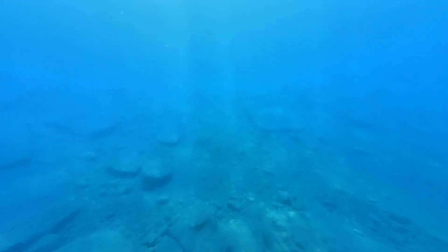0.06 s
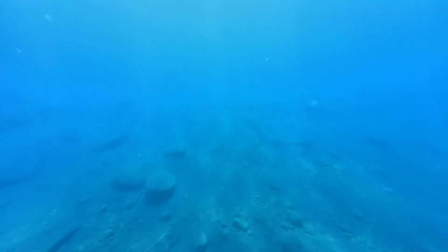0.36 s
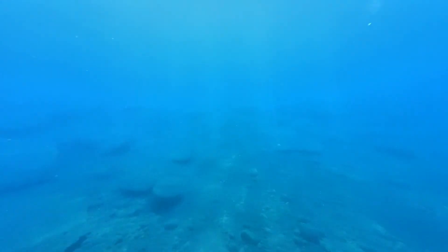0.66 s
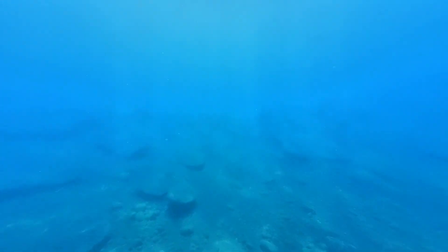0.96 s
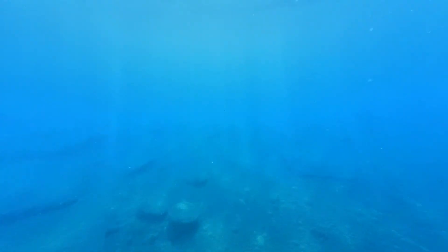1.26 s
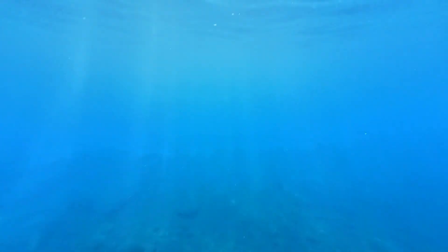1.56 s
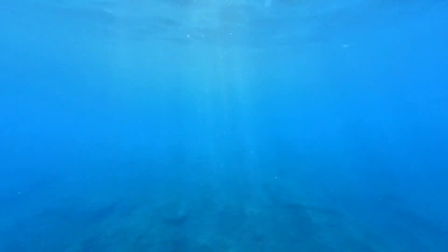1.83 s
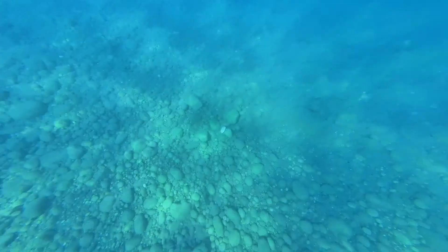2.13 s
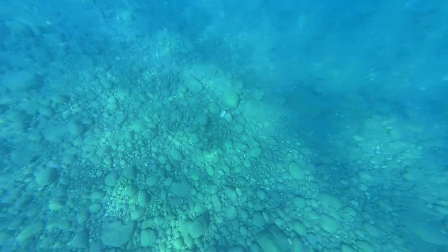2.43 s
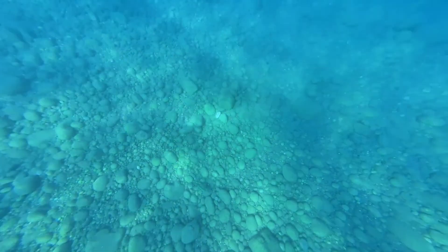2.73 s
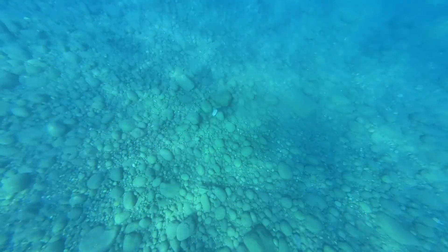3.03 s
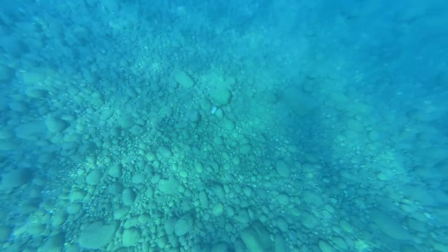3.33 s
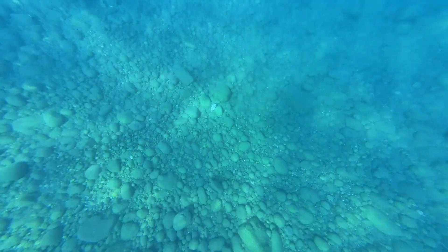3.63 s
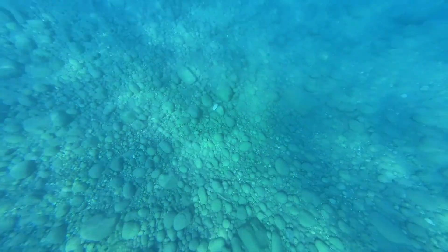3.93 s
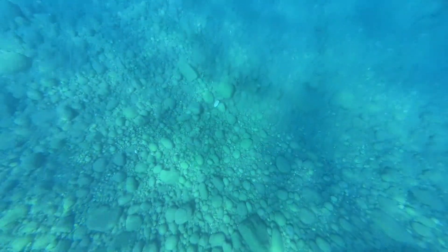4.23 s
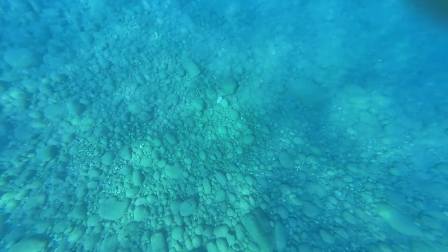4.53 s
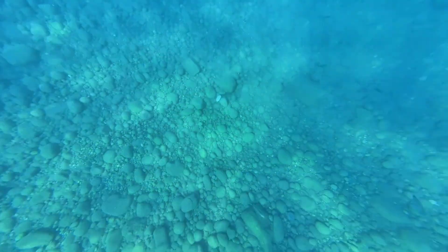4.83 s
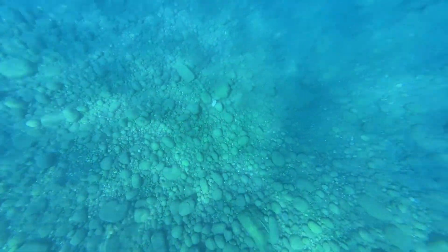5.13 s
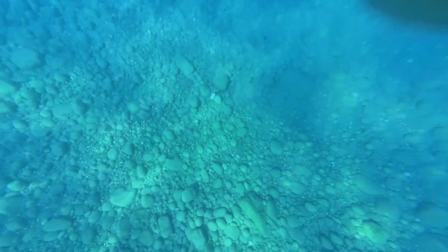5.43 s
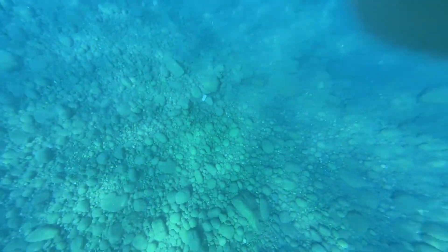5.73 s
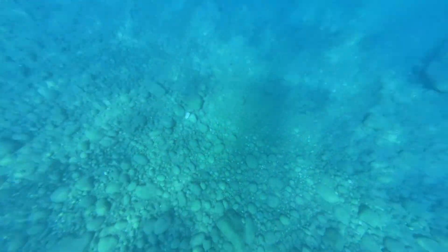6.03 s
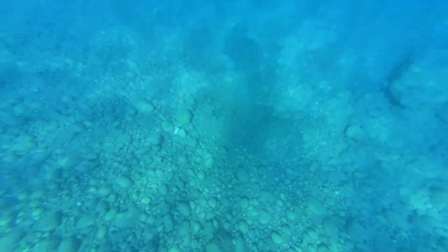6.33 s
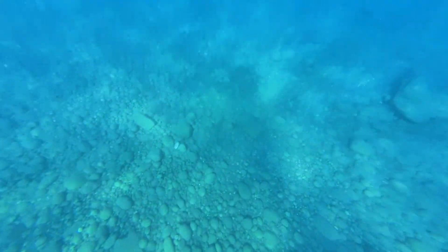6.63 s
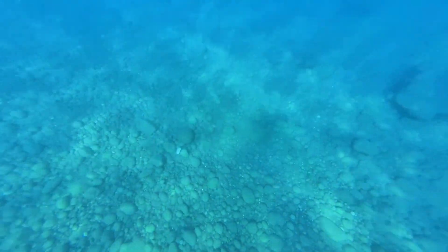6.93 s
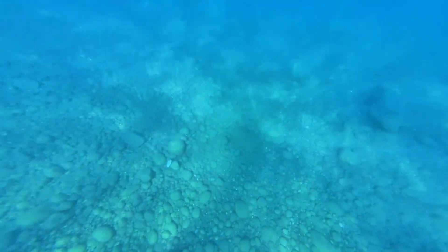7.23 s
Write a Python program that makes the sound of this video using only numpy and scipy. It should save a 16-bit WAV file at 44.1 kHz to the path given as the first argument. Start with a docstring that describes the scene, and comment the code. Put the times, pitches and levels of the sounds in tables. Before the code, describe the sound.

A submerged microphone picks up quiet open-water hiss and distant clicks, then soft lapping near the surface and several close knocks on its casing. Suddenly it is inside a loud cloud of bubbles from a dive, churning, glugging and popping. The low gurgle drops away as the large bubbles leave, and the sound grows thinner, higher and softer until only a light fizz with small pops remains.

```python
"""Under the sea, inside a dive's bubbles

A microphone in a camera housing hears far crackle and ticks in open water, then gulps, wavelets and
knocks as it nears the surface. After a brief silent cut it sits in a cloud of air dragged down by a dive.
Big bubbles rise away first, so the pitch climbs as the cloud fades from a gurgling rush to a fine fizz."""
import sys
import numpy as np
from scipy import signal
from scipy.fft import rfft, irfft, next_fast_len
from scipy.io import wavfile
from scipy.ndimage import uniform_filter1d

SR = 44100
rng = np.random.default_rng(int(sys.argv[2]) if len(sys.argv) > 2 else 0)


def pcm_store(signal):
    """Save signal as 16-bit PCM."""
    levels = np.round(np.clip(np.atleast_2d(signal), -1, 1) * 32767)
    wavfile.write(sys.argv[1], SR, levels.astype(np.int16).T)


N = 329868
FFT_SIZE = 2 * next_fast_len(N)
TIME, BINS_HZ = np.arange(N) / SR, np.fft.rfftfreq(FFT_SIZE, 1 / SR)
CUT_START_S, CUT_END_S = 2.155, 2.175

# open water, far off: freq_hz, gain_db
SEA_COLOUR = [(35, -35), (75, -3), (170, 0.5), (300, -5.5), (600, -11.5), (1500, -14.5), (3600, -15.5),
              (4500, -1), (5500, 2.5), (6500, -4.5), (7600, -20.5), (10000, -34), (12500, -43)]
# water moving round the housing: freq_hz, gain_db
RUMBLE_COLOUR = [(25, -25), (60, -4.5), (100, -2.5), (160, -8.5), (400, -30), (1500, -79)]
# surges against the housing: crest_s, level_db, half_length_s
SURGES = [(0.63, -66, 0.032), (1.584, -58, 0.078), (1.898, -46, 0.14), (2.335, -32.5, 0.052),
          (2.739, -37.5, 0.037), (3.214, -52, 0.066), (3.586, -47, 0.049), (5.394, -62, 0.11)]
# single bubbles near the microphone: start_s, level_db, pitch_hz, glide_ratio, t60_s, splash_share
NEAR_BUBBLES = [(.002, -53.5, 558, 0.015, 0.13, 0.36), (.002, -50, 1750, 0.044, 0.078, 0.2),
                (.043, -55, 2920, -.03, 0.041, 0.3), (.226, -54, 1875, -0.24, 0.045, 0.55),
                (.44, -52, 3950, -.1, 0.03, 0.9), (.458, -59, 3080, -.12, 0.063, 0.94),
                (.6, -50, 2500, -0.2, .05, 1), (.619, -47.5, 99.5, -0.4, 0.057, 0),
                (.624, -59, 1990, -.17, 0.044, .7), (1.203, -48.5, 1740, -0.15, .075, 0.1),
                (1.214, -41.5, 2890, -0.071, .035, 0.03), (1.224, -55, 2320, -.05, 0.04, 0),
                (1.424, -57, 2000, 0, 0.029, 0.5), (1.453, -31, 2610, -0.19, .023, 0.15),
                (1.57, -41.5, 86.7, 0.17, 0.074, 0.3), (1.702, -43.5, 3050, -0.16, 0.028, 0.2),
                (1.757, -53, 990, -0.11, .08, .4), (1.787, -40, 309, -0.52, .15, 0),
                (1.79, -59, 1630, 0.14, 0.11, 0.8), (1.832, -36, 122, 0.031, 0.1, 0.1),
                (1.85, -46.5, 724, 0.086, 0.055, .3), (1.893, -55, 1830, 0, .06, 0.5),
                (1.901, -33.5, 88, -0.15, 0.091, 0.14), (2.024, -48, 3200, -.05, 0.033, .3),
                (2.043, -51, 2550, -0.038, .035, .2), (2.044, -53, 1150, 0, 0.1, 0),
                (2.19, -19, 769, -0.18, 0.12, .25), (2.235, -28.5, 174.6, 0.24, 0.23, 0.17),
                (2.6, -18.5, 1047, -.094, 0.092, .5), (2.612, -16, 1246, 0.035, .07, 0.2),
                (2.648, -11, 505, -.14, .16, .03), (2.68, -16, 720, -0.035, 0.083, 0.1),
                (3.191, -31.5, 338, -0.16, 0.11, 0.2), (3.227, -31.5, 166, -0.079, .15, 0.05),
                (3.28, -28.5, 400, -0.0038, 0.11, .3), (3.519, -23, 1364, -0.063, .075, .3),
                (3.558, -22, 1405, 0.0069, 0.077, .3), (3.614, -41, 152, 0.084, .18, .1),
                (3.696, -28, 749, -0.043, 0.1, 0), (3.701, -24, 1100, 0.13, 0.078, .4),
                (4.156, -29.5, 1500, 0, 0.047, 0.2), (4.279, -32.5, 167, -0.2, 0.17, 0.01),
                (4.597, -50, 171, -.083, 0.14, 0), (4.868, -42.5, 158, -0.12, 0.14, .3),
                (4.999, -49, 118, -.45, 0.069, 0.05), (5.139, -52, 120, -0.41, .11, 0),
                (5.455, -48, 744, 0.027, .12, 0.8), (5.585, -42, 1484, -0.052, 0.054, 0.33),
                (5.762, -41.5, 764, 0.27, .06, .6), (5.776, -45, 1023, 0.41, 0.085, 0.8),
                (5.792, -41, 840, .02, 0.075, 0.2), (5.943, -48, 595, 0.028, .11, 0),
                (5.948, -53, 755, 0.077, .14, 0.7), (6.014, -44.5, 104, -0.23, 0.064, 0.2),
                (6.083, -46, 875, -.03, .06, .4), (6.099, -53.5, 450, 0.02, 0.12, 0.95),
                (6.146, -34.5, 1207, 0.11, 0.08, .2), (6.19, -42, 1250, 0.028, 0.065, 0.85),
                (6.355, -52, 724, -0.11, 0.064, 1), (6.554, -57, 85, -0.043, 0.071, 0.2),
                (6.681, -62, 109.6, 0, 0.11, 0.06), (7.09, -52, 860, -0.092, 0.075, .2),
                (7.292, -40.5, 2390, -0.024, 0.035, .7), (7.307, -43, 1800, -.06, 0.047, 0.36),
                (7.352, -42.5, 1634, -0.012, 0.069, .3), (7.357, -50, 1300, -0.073, .05, .6),
                (7.36, -58, 660, -0.32, .1, .7)]
# ticks out in open water: start_s, level_db, pitch_hz, scatter_db, sharpness_q
TICKS = [(0.236, -50, 6400, -52.5, 4.2), (0.377, -59, 5830, -54, 6), (.545, -33.5, 5160, -49.5, 2.9),
         (.6, -56, 2400, -55, 1.5), (.650, -58, 3560, -48, 1.1), (0.689, -28.5, 5850, -52, 8),
         (0.778, -34.5, 4960, -54, 3.3), (0.781, -43, 3520, -53, 3), (1.047, -29.5, 5350, -48, 7),
         (1.184, -32, 5600, -50, 5.6), (1.304, -49, 5400, -52.5, 4.4), (1.374, -39, 5140, -53, 3),
         (1.454, -36.5, 4800, -49, 3), (1.789, -39, 6030, -49, 2.8), (2.0606, -33, 4570, -44, 3.5)]
# what the housing leaves of a snap's treble: freq_hz, gain_db
SNAP_ROLLOFF = [(6300, 0), (7500, -11), (10000, -13), (12000, -24)]
# wavelets overhead: freq_hz, gain_db
LAP_COLOUR = [(200, -22), (500, -3), (800, -20), (1300, -21), (1850, -10.5), (2400, -23), (3300, -15.5),
              (5000, -11.5), (9000, -38), (13000, -70)]
# air trapped by a folding wavelet: freq_hz, gain_db
SLOSH_COLOUR = [(100, 4.5), (280, 7.5), (450, -6), (750, -9), (1100, -19), (2000, -30), (4000, -60)]
# bumps on the housing: start_s, click_db, click_hz, thump_db, thump_hz, thump_t60_s
KNOCKS = [(1.950, -14, 2970, -26, 193, 0.029), (1.9994, -35.5, 790, -33, 149, .045),
          (2.1058, -13.5, 2700, -24, 153, 0.046), (2.336, -12, 252, -10, 154, 0.039),
          (6.361, -48.5, 497, -60, 167, 0.044)]
# the cloud as each bubble size rises away: time_s, commonest_pitch_hz, level_db
CLOUD_COURSE = [(2.18, 1030, -8), (2.3, 1140, -10.5), (2.64, 1100, -8.3), (2.8, 1125, -10),
                (2.95, 1096, -10.5), (3.3, 1150, -11.5), (3.44, 1290, -14.5), (3.56, 1540, -18),
                (3.61, 2010, -22), (3.68, 2500, -23.5), (3.95, 2740, -24.5), (4.85, 2830, -25),
                (5.08, 3100, -26), (5.22, 3800, -29), (5.55, 4200, -30.5), (5.72, 4640, -30.5),
                (6.12, 4790, -33), (6.28, 5180, -35.5), (7.48, 5340, -36.5)]
# spread of bubble sizes about the commonest: pitch_ratio, gain_db
BUBBLE_SIZES = [(0.1, -27), (0.25, -11), (0.5, -7.5), (0.75, -3.5), (1.0, 0.92), (1.25, -7), (1.6, -12),
                (2.5, -23), (4.0, -30.5), (8.0, -48.5), (11, -68.5)]
# what the housing lets through to the microphone: freq_hz, gain_db
HOUSING_COLOUR = [(150.0, -0.5), (350.0, -9.5), (600.0, -1), (1000.0, -4.5), (1500.0, -5), (2000.0, -3),
                  (3000.0, -3), (4500.0, -5.5), (5600.0, -5), (6500.0, -22.5), (7500.0, -23), (10000, -24),
                  (12000.0, -44)]
# resonances of the housing: freq_hz, half_width_hz, gain_db
HOUSING_MODES = [(732, 36, 5), (875, 60, 3), (985, 50, 4), (1095, 48, 6.5), (1222, 48, 6.5), (1355, 58, 9),
                 (1495, 75, 11.5), (1675, 75, 7.5), (1845, 40, 3), (2050, 55, 4), (2150, 60, 5),
                 (2365, 85, 7.5), (2590, 75, 4.5), (2770, 100, 5), (2920, 80, 3), (3340, 110, 2.5),
                 (3640, 90, 1)]
# large bubbles tearing loose: freq_hz, gain_db
GURGLE_COLOUR = [(70, -31), (130, -14), (220, -3), (350, -7), (500, -1.5), (800, -23), (1000, -38)]
# the finest bubbles: freq_hz, gain_db
FIZZ_COLOUR = [(780, -77), (1050, -44), (1500, -52.5), (2200, -82), (3500.0, -92.5), (5600.0, -48.5),
               (6800.0, -54), (7700.0, -67.5), (9700.0, -77), (11200.0, -93), (13000.0, -102)]
# narrow housing resonances that the fizz excites: freq_hz, width_hz, gain_db
FIZZ_RINGS = [(3060, 80, -34.5), (3620, 110, -45), (3990, 150, -38), (4830, 280, -44), (5260, 180, -39.5),
              (5710, 120, -47), (6370, 110, -48)]
# pricks right at the housing: freq_hz, gain_db
CRACKLE_COLOUR = [(2000, -18), (4000, -6), (6200, 5.5), (7500, -5.5), (10000, -14), (12000, -32.5)]
# the sizzle's comings and goings: time_s, level_db
SIZZLE_LEVEL = [(2.25, -93), (2.38, -93), (3.99, -81.5), (4.33, -88), (4.77, -79), (5.7, -84.5),
                (6.33, -80.5), (6.43, -96), (6.61, -79.5), (7.41, -83), (7.45, -75.5)]
# specks of air, at the top of the band: freq_hz, gain_db
SIZZLE_COLOUR = [(7500, -31), (8800, -9), (9600, 4), (10200, -2.5), (10800, -12), (11600, -28)]
# bubbles bursting against the housing: start_s, level_db, pitch_hz, scatter_db
BURSTS = [(2.177, -17, 1100, -27), (2.614, -17, 1930, -34), (2.936, -22, 2400, -39),
          (3.084, -19, 1300, -40), (3.2012, -17, 1200, -40), (3.248, -12.5, 1200, -37),
          (3.3537, -10.5, 1210, -37), (3.649, -18.5, 2440, -35), (3.651, -30, 4000, -43),
          (3.697, -21, 1500, -35), (3.712, -24, 1770, -35), (3.779, -16, 2410, -32),
          (3.7795, -26, 1400, -36), (4.2987, -23, 2600, -43), (4.383, -21, 2730, -41),
          (4.7086, -22, 2740, -40), (4.834, -21, 2890, -38), (5.1229, -27, 3200, -46),
          (5.332, -22, 3980, -39), (5.391, -27, 4020, -43), (5.5615, -21.5, 3940, -38),
          (6.089, -31, 5450, -48), (6.25, -30, 5000, -48), (6.547, -28.5, 4800, -52),
          (6.614, -36, 4200, -44), (6.7275, -28, 4700, -42), (6.828, -38, 2000, -54),
          (6.938, -26.5, 5200, -43), (6.963, -34, 4600, -46), (7.3523, -32, 5200, -49)]


def amp(db):
    """Decibels to gain."""
    return 10 ** (np.asarray(db) / 20)


def unit_rms(x):
    """Scales to rms 1."""
    return x / np.sqrt(np.mean(x ** 2) + 1e-20)


def colour_db(points, hz=BINS_HZ):
    """Reads a spectrum along a log-frequency axis."""
    freqs, gains_db = np.transpose(points)
    return np.interp(np.log(hz + 1e-6), np.log(freqs), gains_db)


def follow(rows, t):
    """All columns of a curve at the times t."""
    times, *columns = np.transpose(rows)
    return [np.interp(t, times, column) for column in columns]


def add(mix, start_s, sound):
    """Mixes a sound in at start_s."""
    part = mix[max(round(start_s * SR), 0):][:len(sound)]
    part += sound[:len(part)]


def coloured(x, gain_db):
    """Filters a whole track by a gain for every bin."""
    return irfft(rfft(x, FFT_SIZE) * amp(gain_db))[:N]


def to_spectra(x, frame=1024):
    """Frequencies, times and short-time spectra of a track."""
    return signal.stft(x, SR, nperseg=frame, noverlap=frame * 3 // 4)


def to_track(spectra, frame=1024):
    """Joins short-time spectra into a track."""
    return signal.istft(spectra, SR, nperseg=frame, noverlap=frame * 3 // 4)[1][:N]


def ripple(shape, bins, frames):
    """A random field of rms 1, smoothed over frequency bins and time frames."""
    field = uniform_filter1d(rng.standard_normal(shape), bins, axis=0)
    return unit_rms(uniform_filter1d(field, frames, axis=1))


def patchy(x, depth_db, bins, frames, frame=512):
    """Makes a track swell and dip in random patches of frequency and time."""
    spectra = to_spectra(x, frame)[2]
    return to_track(spectra * amp(depth_db * ripple(spectra.shape, bins, frames)), frame)


def pops(per_s, spread_db):
    """A white crackle of rms 1: random impulses, most small, a few large."""
    size = amp(spread_db * np.minimum(rng.exponential(1, N), 5))
    return unit_rms(size * rng.choice([-1, 1], N) * (rng.random(N) < per_s / SR))


def climb_octaves(t, fresh_hz=1080):
    """How far the cloud's pitch stands above that of the fresh cloud."""
    return np.log2(follow(CLOUD_COURSE, t)[0] / fresh_hz)


def sea(level_db=-61.5, hiss_share=0.56):
    """Countless far clicks merge into a gently wavering hiss; nearer ones stand out of it."""
    far = np.sqrt(hiss_share) * rng.standard_normal(N)
    nearer = np.sqrt(1 - hiss_share) * pops(per_s=900, spread_db=3.4)
    clicks = patchy(far + nearer, depth_db=-0.3, bins=8, frames=10)
    swell_db = 1.3 * unit_rms(np.interp(TIME, np.linspace(0, N / SR, 150), rng.standard_normal(150)))
    return amp(level_db + swell_db) * unit_rms(coloured(clicks, colour_db(SEA_COLOUR)))


def surge(crest_s, level_db, half_length_s):
    """A bell-shaped swell of gain."""
    return amp(level_db) * np.exp(-((TIME - crest_s) / half_length_s) ** 2)


def flow(calm_db=-89, stirred_db=-53, fall_db_per_octave=30.5):
    """Water rumbles round the housing: faint when calm, stirred by the cloud, swelling in surges."""
    rumble = unit_rms(coloured(rng.standard_normal(N), colour_db(RUMBLE_COLOUR)))
    stirred = (TIME >= CUT_END_S) * amp(stirred_db - fall_db_per_octave * climb_octaves(TIME))
    return (amp(calm_db) + stirred + sum(surge(*row) for row in SURGES)) * rumble


def ring(hz, t60_s, glide, rise_cycles=0.095):
    """A sine of peak 1 whose pitch slides as it dies away, like a pulsing pocket of air."""
    t = np.arange(int(t60_s * SR) + 2) / SR
    pitch_hz = hz * (1 + glide * (1 - np.exp(-4 * t / t60_s)))
    envelope = amp(-60 * t / t60_s) * (1 - np.exp(-t * hz / rise_cycles))
    wave = envelope * np.sin(2 * np.pi * np.cumsum(pitch_hz) / SR)
    return wave / abs(wave).max()


def near_bubbles(gain_db=-1, echo_t60_s=0.03, wobble_ratio=0.094):
    """Close bubbles gulp and chirp; splashy ones wobble in shape and scatter, blurring their note."""
    out, t = np.zeros(N), np.arange(4096) / SR
    for start_s, level_db, hz, glide, t60_s, splash in NEAR_BUBBLES:
        clean = ring(hz, t60_s, glide, rise_cycles=0.5)
        lowpass = signal.butter(2, wobble_ratio * hz, fs=SR)
        wobble = signal.lfilter(*lowpass, rng.standard_normal(SR))[-len(clean):]
        echoes = rng.standard_normal(len(t)) * amp(-60 * t / echo_t60_s)
        blurred = signal.fftconvolve(clean * wobble, echoes)
        blurred *= np.linalg.norm(clean) / np.linalg.norm(blurred)
        add(out, start_s, amp(gain_db + level_db) * np.sqrt(1 - splash) * clean)
        add(out, start_s, amp(gain_db + level_db) * np.sqrt(splash) * blurred)
    return out


def snap(hz, level_db, scatter_db, cycles, scatter_t60_s, q):
    """A pulse that crests after the given cycles, then its scatter off the surface and the stones."""
    t = np.arange(4096) / SR
    age = t * hz / cycles
    pulse = age * np.exp(1 - age) * np.sin(2 * np.pi * hz * t)
    scatter = unit_rms(signal.lfilter(*signal.iirpeak(hz, q, fs=SR), rng.standard_normal(len(t))))
    return amp(level_db) * pulse + amp(scatter_db - 60 * t / scatter_t60_s) * scatter


def ticks():
    """Sharp snaps carry in from open water, each trailing its scatter."""
    out = np.zeros(N)
    for start_s, level_db, hz, scatter_db, q in TICKS:
        add(out, start_s, snap(hz, level_db, scatter_db, cycles=1.03, scatter_t60_s=0.065, q=q))
    return coloured(out, colour_db(SNAP_ROLLOFF))


def lapping(near_s=1.86, near_db=-57, rise_db_per_s=36, late_rise_db_per_s=2):
    """Wavelets lap overhead, swelling quickly as the microphone comes up, then only creeping louder."""
    wavelets = patchy(pops(per_s=3000, spread_db=2.5), depth_db=5, bins=4, frames=8)
    since_s = TIME - near_s
    level_db = near_db + np.minimum(rise_db_per_s * since_s, late_rise_db_per_s * since_s)
    return amp(level_db) * unit_rms(coloured(wavelets, colour_db(LAP_COLOUR)))


def swarm(low_hz, high_hz, t60_cycles, glide_spread, count):
    """Bubbles of random size and moment ring across a range of pitch, at rms 1 together."""
    out = np.zeros(N)
    for when, height, slide, force in rng.random((count, 4)):
        hz = low_hz * (high_hz / low_hz) ** height
        bubble = ring(hz, t60_cycles / hz, glide_spread * (2 * slide - 1))
        add(out, when * N / SR, amp(10 * force) * hz * bubble)
    return unit_rms(out)


def slosh():
    """One wavelet folds over and traps a short flurry of bubbles."""
    flurry = swarm(low_hz=108, high_hz=2300, t60_cycles=12, glide_spread=0.36, count=1700)
    fold = surge(crest_s=1.815, level_db=-46.5, half_length_s=0.04)
    return fold * unit_rms(coloured(flurry, colour_db(SLOSH_COLOUR)))


def knocks():
    """Something bumps the housing: a dry click and a low thump that sinks in pitch."""
    out = np.zeros(N)
    for start_s, click_db, click_hz, thump_db, thump_hz, thump_t60_s in KNOCKS:
        click = snap(click_hz, click_db, click_db - 28, cycles=0.27, scatter_t60_s=0.0196, q=2.5)
        add(out, start_s, click)
        add(out, start_s, amp(thump_db) * ring(thump_hz, thump_t60_s, glide=-0.5, rise_cycles=0.52))
    return coloured(out, colour_db(SNAP_ROLLOFF))


def housing_modes_db():
    """What the housing's resonances add at each frequency."""
    return sum(db * np.exp(-((BINS_HZ - hz) / width) ** 2) for hz, width, db in HOUSING_MODES)


def cloud(gain_db=-0.5, churn_octaves=0.05, top_mode_db=8, top_mode_half_width_hz=160):
    """Thousands of bubbles a second pulse all round the microphone, higher as the big ones leave."""
    hz, t, spectra = to_spectra(pops(per_s=9000, spread_db=2.2))
    pitch_hz, level_db = follow(CLOUD_COURSE, t)
    pitch_hz *= 2 ** (churn_octaves * ripple((1, len(t)), bins=1, frames=4)[0])
    sizes_db = colour_db(BUBBLE_SIZES, hz[:, None] / pitch_hz)
    flicker_db = ripple(spectra.shape, bins=10, frames=9)
    # echoes off the surface and the diver comb the spectrum; the comb drifts as the camera moves
    comb_db = 2 * ripple(spectra.shape, bins=2, frames=36)
    mode_hz = 4222 - 90.9 * climb_octaves(t)  # one high resonance sinks as the cloud thins
    mode_db = top_mode_db * np.exp(-((hz[:, None] - mode_hz) / top_mode_half_width_hz) ** 2)
    rush = to_track(spectra * amp(level_db + sizes_db + flicker_db + comb_db + mode_db))
    return coloured(rush, gain_db + colour_db(HOUSING_COLOUR) + housing_modes_db())


def gurgle(gain_db=-22, big_gone_hz=2990, gone_over_octaves=0.034, drop_db=13.5):
    """Large bubbles break off the cloud and ring, dropping away once its pitch says they have gone."""
    rings = swarm(low_hz=77.4, high_hz=993, t60_cycles=20, glide_spread=0.08, count=2600)
    housed = coloured(rings, gain_db + colour_db(GURGLE_COLOUR) + housing_modes_db())
    pitch_hz, level_db = follow(CLOUD_COURSE, TIME)
    gone = 0.5 + 0.5 * np.tanh(np.log2(pitch_hz / big_gone_hz) / gone_over_octaves)
    return housed * amp(level_db - drop_db * gone)


def fizz(gain_db=-1.5, growth_db_per_octave=0.5, wake_s=5.9, wake_over_s=0.14, asleep_db=-20.5):
    """The finest bubbles hang in the water and crackle in clusters; late on they ring the housing."""
    hz, t, spectra = to_spectra(pops(per_s=3600, spread_db=3.7))
    drift_db = 1.7 * ripple(spectra.shape, bins=3, frames=40)
    drift_db += 1.8 * ripple(spectra.shape, bins=16, frames=100)
    rings = sum(amp(db) / (1 + (2 * (hz - ring_hz) / width) ** 2) for ring_hz, width, db in FIZZ_RINGS)
    awake = amp(asleep_db * (0.5 - 0.5 * np.tanh((t - wake_s) / wake_over_s)))
    colour = amp(colour_db(FIZZ_COLOUR, hz)[:, None] + drift_db) + rings[:, None] * awake
    clusters_db = 2.5 * ripple(spectra.shape, bins=40, frames=22)
    fizzing = to_track(spectra * colour * amp(gain_db + clusters_db))
    return fizzing * amp(growth_db_per_octave * climb_octaves(TIME))


def crackle(level_db=-74, fall_db_per_octave=0.5):
    """Tiny bubbles prick right at the housing, bright and dry, a touch softer as the cloud thins."""
    pricks = unit_rms(coloured(pops(per_s=70, spread_db=3), colour_db(CRACKLE_COLOUR)))
    return amp(level_db - fall_db_per_octave * climb_octaves(TIME)) * pricks


def sizzle():
    """A thin, bright sizzle of specks of air comes and goes above the fizz."""
    specks = patchy(pops(per_s=700, spread_db=3.9), depth_db=3.5, bins=10, frames=50, frame=1024)
    return amp(follow(SIZZLE_LEVEL, TIME)[0]) * unit_rms(coloured(specks, colour_db(SIZZLE_COLOUR)))


def bursts():
    """Bubbles burst against the housing and stand out of the cloud, higher as they get smaller."""
    out = np.zeros(N)
    for start_s, level_db, hz, scatter_db in BURSTS:
        add(out, start_s, snap(hz, level_db, scatter_db, cycles=0.9, scatter_t60_s=0.032, q=3.8))
    return coloured(out, colour_db(SNAP_ROLLOFF))


def scene(screened_sea_db=-6):
    """Open water until the cut; then the cloud surrounds the microphone and screens off the sea."""
    open_water = sea()
    before = open_water + lapping() + slosh() + ticks()
    fine_bubbles = crackle() + sizzle() + fizz()
    after = amp(screened_sea_db) * open_water + cloud() + gurgle() + bursts() + fine_bubbles
    surroundings = np.where(TIME < CUT_END_S, before, after)
    return (surroundings + flow() + near_bubbles() + knocks())[None]


def record(dry, low_cut_hz=42, high_cut_hz=12500, fade_s=0.0005):
    """The deepest bass and highest treble are lost, and the sound falls silent for a moment at a cut."""
    thin = signal.sosfilt(signal.butter(2, low_cut_hz, "high", fs=SR, output="sos"), dry)
    audible = np.clip(np.maximum(CUT_START_S - TIME, TIME - CUT_END_S) / fade_s, 0, 1)
    lowpass = signal.firwin(255, high_cut_hz, window=("kaiser", 8), fs=SR)
    return signal.oaconvolve(thin * audible, lowpass[None], "same")


dry = scene()
out = record(dry)
pcm_store(out)
```